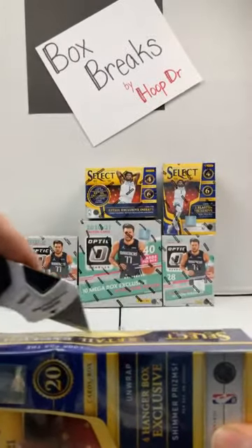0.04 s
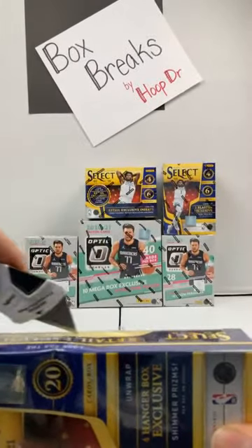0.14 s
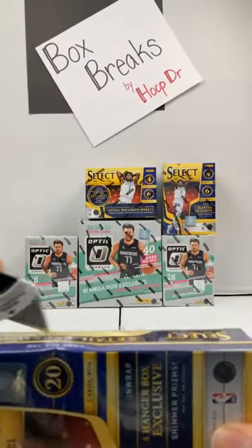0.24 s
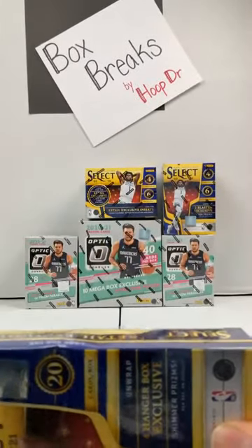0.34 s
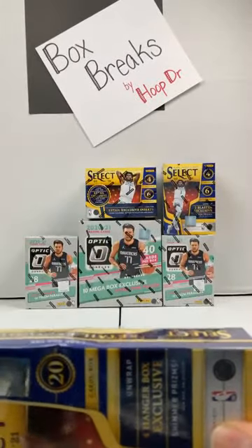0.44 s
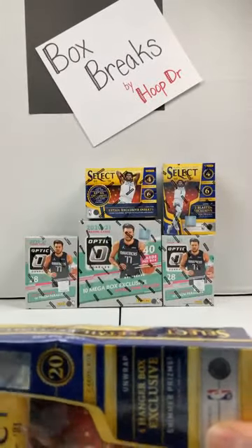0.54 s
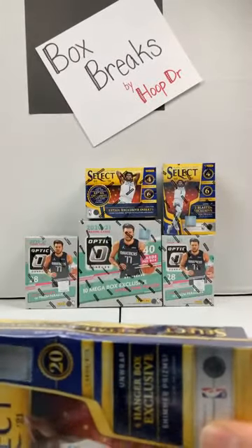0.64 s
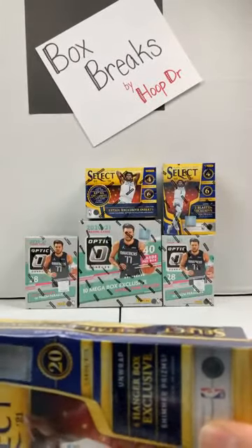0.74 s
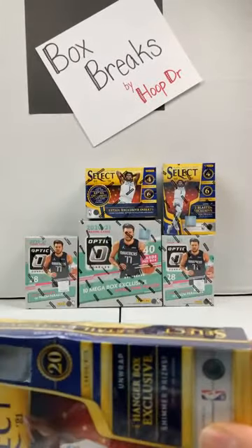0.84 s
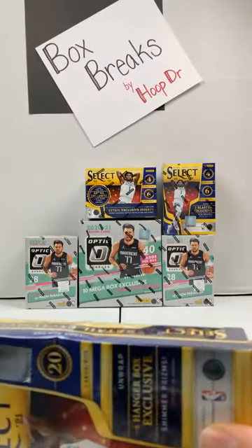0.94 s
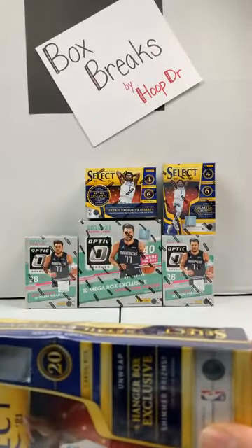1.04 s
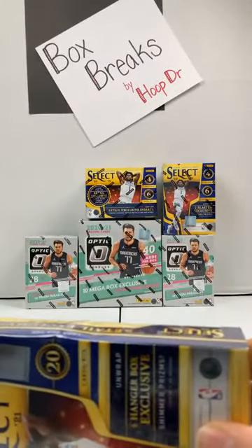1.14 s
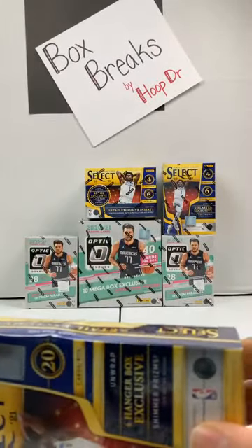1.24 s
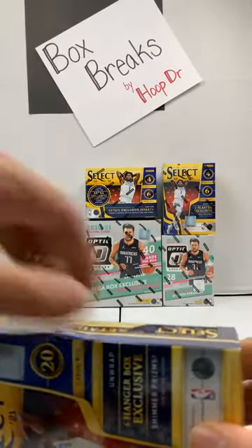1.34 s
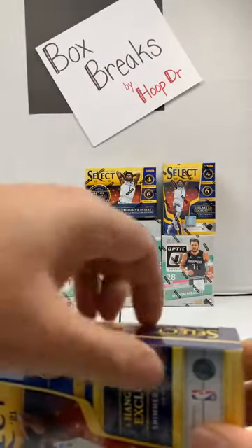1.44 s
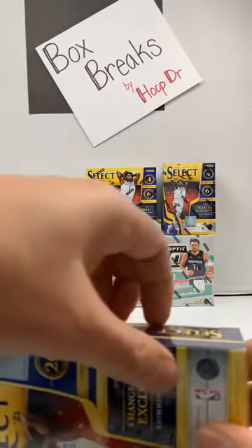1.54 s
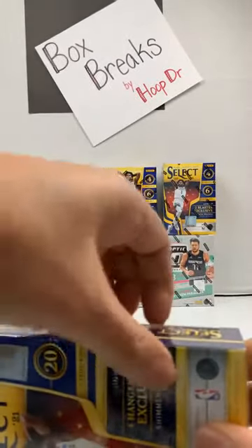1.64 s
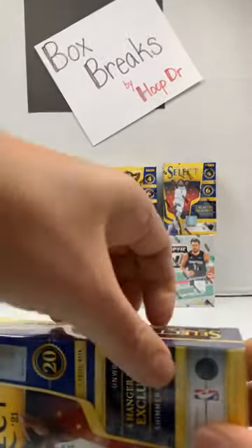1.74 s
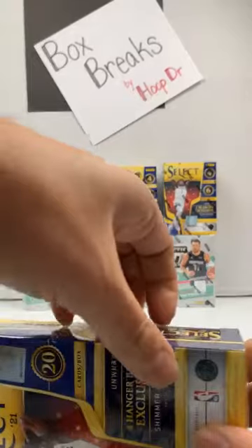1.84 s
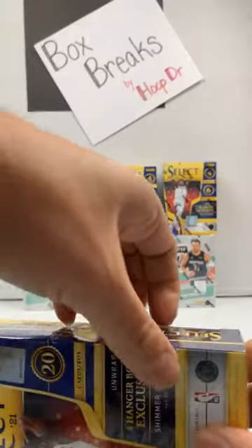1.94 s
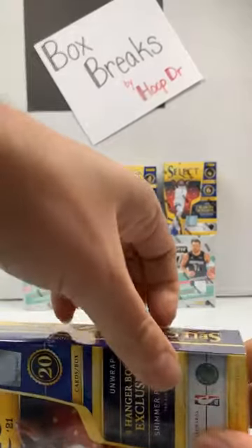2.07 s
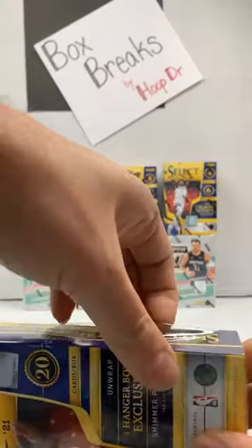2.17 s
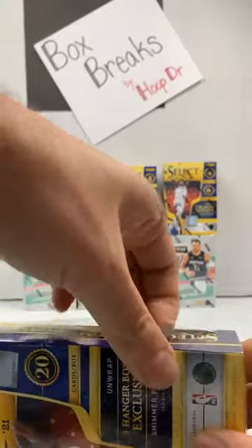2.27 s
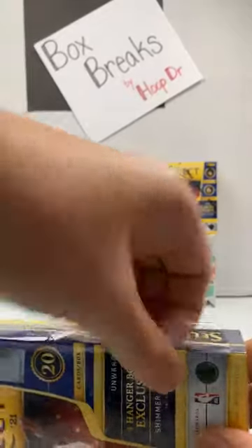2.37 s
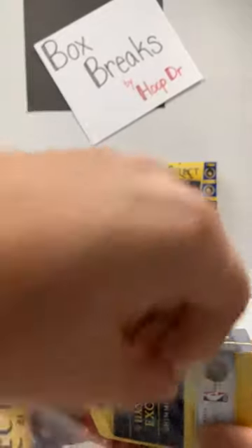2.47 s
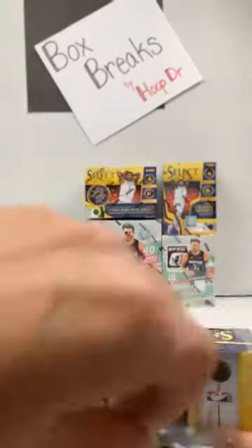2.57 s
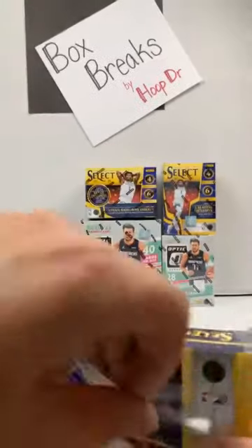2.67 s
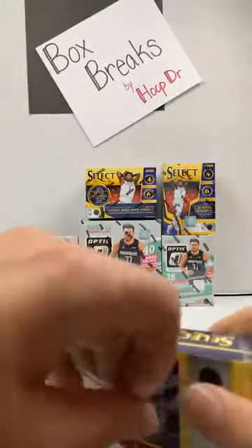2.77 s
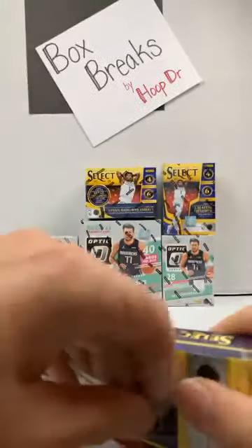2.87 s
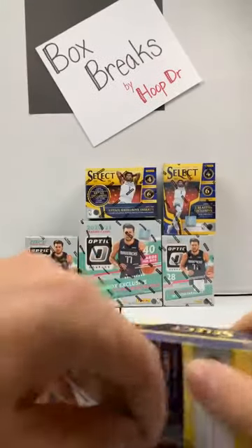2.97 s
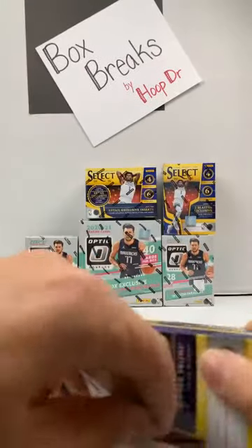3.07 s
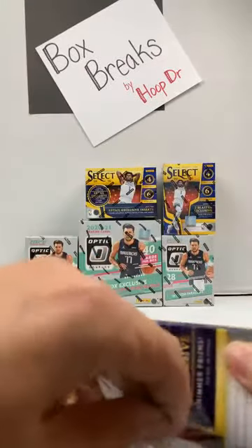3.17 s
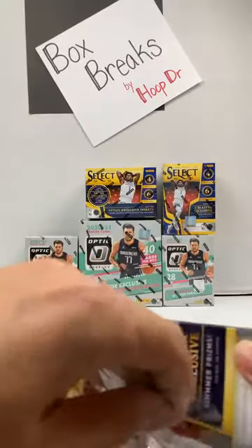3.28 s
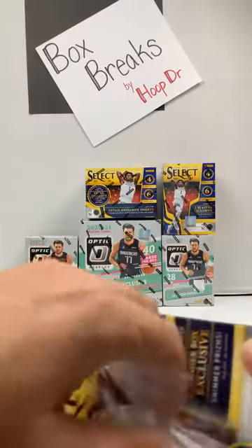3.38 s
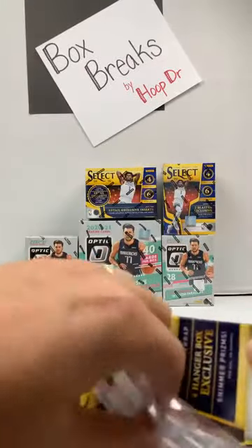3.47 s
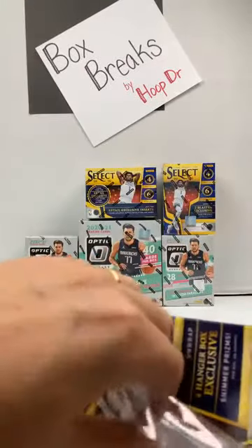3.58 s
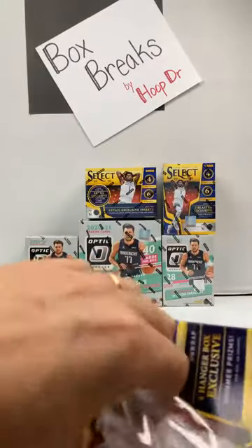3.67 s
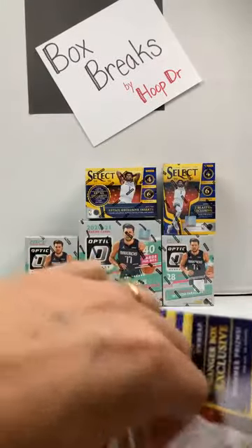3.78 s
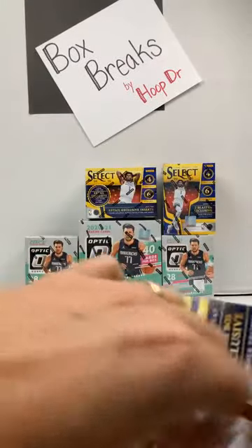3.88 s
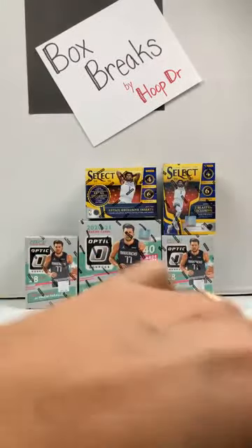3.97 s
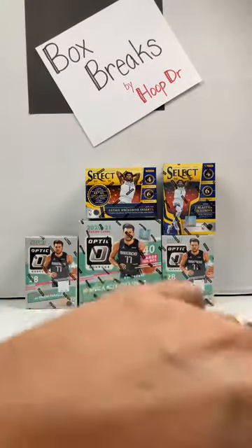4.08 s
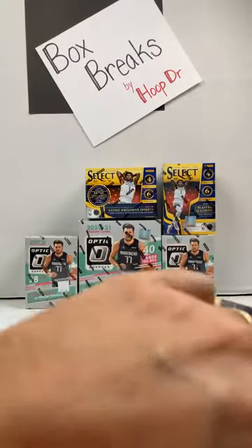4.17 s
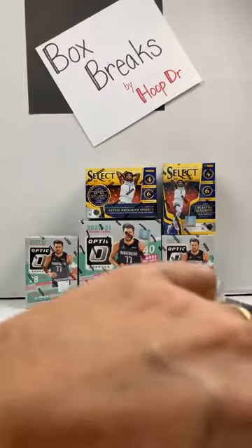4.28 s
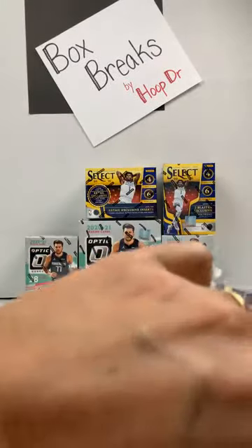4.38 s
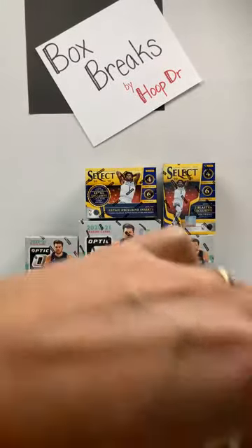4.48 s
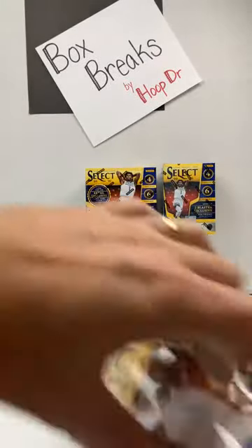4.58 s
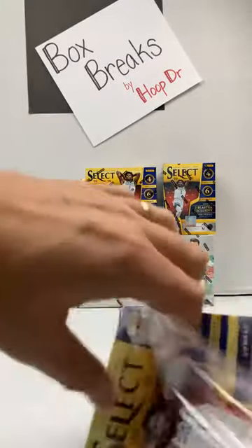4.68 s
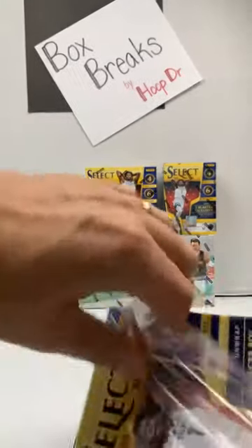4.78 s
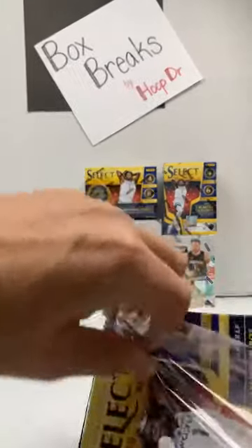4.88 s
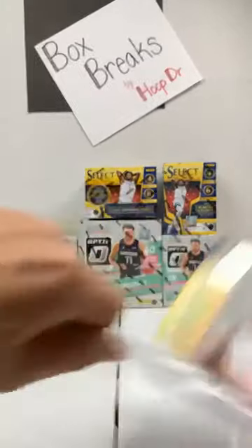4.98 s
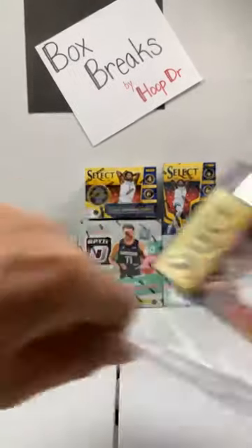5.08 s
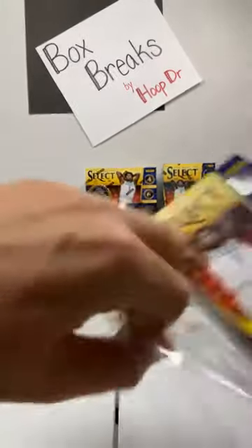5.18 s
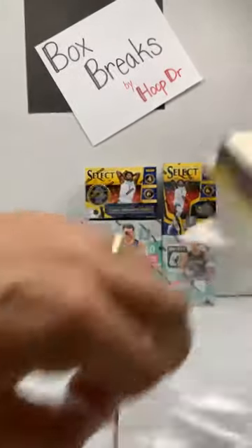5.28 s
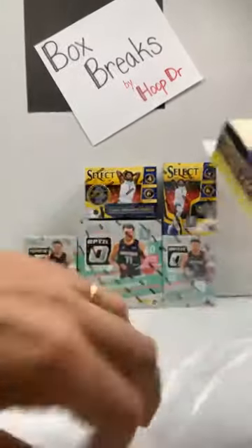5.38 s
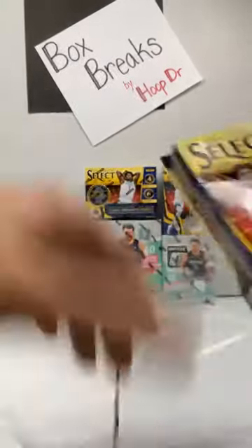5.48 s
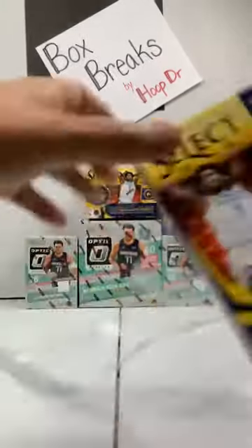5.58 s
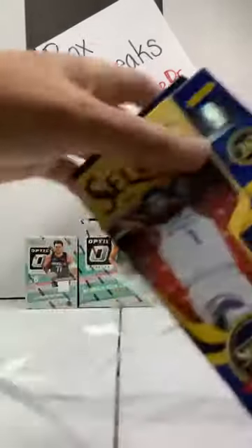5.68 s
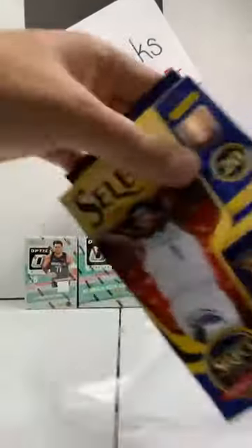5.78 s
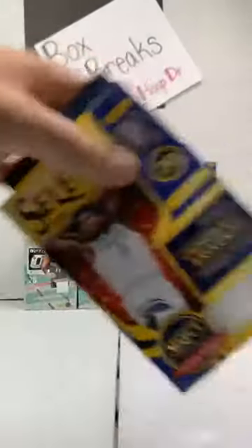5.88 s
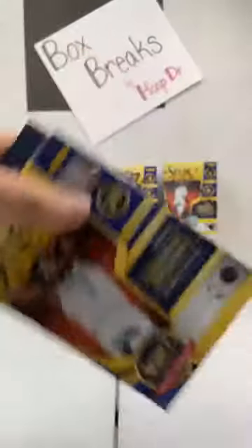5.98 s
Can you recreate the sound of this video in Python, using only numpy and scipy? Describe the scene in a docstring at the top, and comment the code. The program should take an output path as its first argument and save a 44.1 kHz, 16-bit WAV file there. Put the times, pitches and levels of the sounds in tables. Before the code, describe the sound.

A blade briefly scrapes through the plastic wrap on a cardboard box, then the knife is put down on a table with a small metallic rattle. Fingers tap the box and begin picking, tearing and crumpling the film, with sharp snaps and hollow cardboard knocks that grow loudest near the end. The handling sounds close, in a small room with a faint low hum.

```python
"""A blade scrapes out of the plastic wrap of a cardboard box, the board droning under it.
Around 1 s the knife is put down: loose metal rings, the handle knocks on the table.
From 1.4 s fingers tap the box, then pick, tear and crumple the film; it snaps and the box answers.
At 3.5 s the hands grip the box: its notes change, the film hangs loose and its creases sound lower.
Throughout, a small room rings briefly over a low wavering hum and a slowly growing table rumble."""
import sys
import numpy as np
from scipy import signal
from scipy.fft import rfft, irfft, next_fast_len
from scipy.io import wavfile
from scipy.ndimage import map_coordinates

SR = 44100
rng = np.random.default_rng(int(sys.argv[2]) if len(sys.argv) > 2 else 0)


def int16_out(signal):
    """Quantize to a 16-bit WAV file."""
    q = np.round(np.clip(np.atleast_2d(signal).T, -1, 1) * 32767)
    wavfile.write(sys.argv[1], SR, q.astype(np.int16))


N = 265482
GRIP_S = 3.52  # hands close on the box
LEAD_S = 0.006  # faint noise lead-in just before each burst

# Film spectrum: f/Hz, level/dB
FILM_SPECTRUM = [(880, -11), (1500, -9), (2510, -0.5), (2860, -5), (3280, -2.5), (9560, -2.5), (13800, -12),
                 (16000, -18)]
# Film snaps, short rips and finger taps on the box: t/s, length/s, rms level/dB, knock re level/dB
SNAPS_AND_TAPS = [(0.44, 0.0025, -44.5, 16), (0.47, 0.0052, -43, -27), (0.475, 0.018, -48.5, 6),
                  (1.408, 0.0046, -69.5, 1), (1.505, 0.0055, -53, 23), (1.514, 0.0028, -49.5, 19),
                  (1.5253, 0.0025, -57, 23.5), (1.576, 0.0023, -60, 8), (1.711, 0.0036, -72, 28),
                  (1.7556, 0.0049, -50, 18), (1.758, 0.0027, -47.5, -22), (1.954, 0.0054, -81, 33.5),
                  (2.241, 0.0051, -33.5, 3), (2.307, 0.0044, -35, -4.5), (2.377, 0.014, -47, 11.5),
                  (2.4144, 0.0084, -40.5, -1), (2.428, 0.019, -43, 2.5), (2.465, 0.0098, -40, -1),
                  (2.4746, 0.0021, -28, -5.5), (2.5068, 0.0065, -29.5, 1.5), (2.5435, 0.0047, -46, -12),
                  (2.5556, 0.0025, -28.5, 4.5), (2.584, 0.0032, -34.5, 2.5), (2.6138, 0.0056, -20, -7.5),
                  (2.6465, 0.0045, -35, -3), (2.674, 0.0025, -29, -24), (2.678, 0.012, -30.5, -2),
                  (2.714, .002, -40, -20), (2.73, .0023, -34.5, -24), (2.757, 0.0023, -35, -8),
                  (2.7635, 0.0029, -24, -11.5), (2.784, 0.0021, -41, -17), (2.824, 0.0024, -33, -4.5),
                  (2.851, 0.0028, -39, -8), (2.861, 0.0022, -39.5, 8), (2.895, 0.0041, -33.5, -24),
                  (2.925, 0.0044, -47, -20), (2.931, 0.0051, -38, -28), (3.0121, 0.0026, -21.5, -5),
                  (3.0232, 0.0068, -28.5, -2.5), (3.068, 0.0031, -30.5, -10), (3.083, 0.0038, -33, -30),
                  (3.1672, 0.0014, -29.5, -16), (3.194, 0.0047, -31.5, -7), (3.271, .0022, -36.5, -8),
                  (3.297, 0.0019, -36, -28), (3.3631, 0.0026, -31, -5.5), (3.445, 0.0028, -34, -24),
                  (3.465, 0.0033, -30, -13), (3.479, .003, -35, -10), (3.489, 0.0039, -23.5, -6),
                  (3.507, .007, -29, -7), (3.517, 0.0016, -24, -4), (3.5927, 0.0016, -17, -1.5),
                  (3.612, 0.0049, -40, 0), (3.63, 0.0036, -28, -13), (3.6584, 0.00085, -29.5, -3),
                  (3.7285, 0.0034, -26, -10.5), (3.8538, 0.01, -34, -0.5), (3.885, 0.0024, -33.5, -1),
                  (3.899, 0.0012, -27.5, 1.5), (3.908, 0.0026, -38, -1), (3.9317, 0.0024, -43, -8),
                  (3.953, 0.0048, -31, -5.5), (3.956, 0.003, -26, -13), (4.017, 0.0024, -32.5, 3),
                  (4.064, 0.0026, -21, -29), (4.081, 0.0034, -37, 1.5), (4.097, .007, -35.5, -7),
                  (4.1304, 0.0078, -33, -3.5), (4.1557, 0.0051, -34.5, 2.5), (4.177, 0.008, -41, 0),
                  (4.213, 0.0063, -29.5, -32), (4.298, 0.0052, -34, -4.5), (4.364, 0.002, -38.5, 0.5),
                  (4.3918, 0.0035, -30, -3.5), (4.531, 0.0026, -46, -2), (4.5705, 0.0076, -36, -32),
                  (4.5955, 0.0067, -38, -5), (4.614, 0.003, -30.5, -26), (4.698, 0.0082, -28, -16),
                  (4.7166, 0.012, -25, -8), (4.745, 0.017, -32, -7), (4.78, 0.0082, -26.5, -8.5),
                  (4.8165, 0.0043, -32.5, 0), (4.8227, 0.0021, -33, -10), (4.85, 0.0019, -31.5, -24),
                  (4.879, 0.0025, -28.5, -5), (4.888, 0.0048, -27, -20), (4.973, 0.0027, -36, -28),
                  (5.0307, 0.0059, -14, -3), (5.063, 0.022, -26.5, -21), (5.1064, .014, -22.5, -9),
                  (5.118, .012, -21.5, -2.5), (5.17, 0.0097, -27.5, -3), (5.184, 0.024, -25, -9.5),
                  (5.261, 0.0082, -25, -15), (5.297, 0.0018, -32, -15), (5.312, 0.0023, -25.5, -33),
                  (5.348, 0.0053, -27.5, -5), (5.364, 0.0023, -24, -13), (5.3774, 0.027, -27, -3),
                  (5.403, 0.019, -21.5, -5.5), (5.507, 0.012, -33.5, -14), (5.629, 0.017, -43.5, -4),
                  (5.762, 0.0049, -46.5, -23), (5.877, 0.0029, -44, -25), (5.911, 0.001, -38, 14.5),
                  (5.92, 0.011, -37.5, -19), (5.9553, 0.0052, -29, -9.5), (5.987, 0.016, -38, -6)]


def snaps_and_taps():
    """A grainy film crack plus a box knock: the crack leads in snaps and rips, the knock in taps."""
    taut_hz, loose_hz = 4790, 3470
    t_s, length_s, level_db, knock_db = columns(SNAPS_AND_TAPS)
    crease_hz = np.where(t_s < GRIP_S, taut_hz, loose_hz) * np.exp(0.052 * rng.standard_normal(t_s.shape))
    envelope = bursts(length_s, lead_in_db=np.minimum(-40 - level_db, -15))  # loud events: deeper onset
    age_s = np.arange(envelope.shape[1]) / SR - LEAD_S
    onset_spike = 1 + 0.72 * (age_s > 0) * np.exp(-np.abs(age_s) / 0.00069)
    noise, grain, knock_noise = rng.standard_normal((len(t_s), 3, len(age_s))).transpose(1, 0, 2)
    burst = noise * amp(3 * grain) * envelope * onset_spike
    corner_hz = 14000 * amp(-0.6 * knock_db)  # more knock, duller crack
    band_grid = np.meshgrid(np.arange(len(t_s)), np.arange(0, 15, 0.05), indexing="ij")
    bands = map_coordinates(rng.standard_normal((len(t_s), 16)), band_grid)
    colour_depth = np.minimum(0.0084 / length_s, 1)  # long rips average many creases

    def response(f):
        band = (f / SR * 2 * (bands.shape[1] - 1)).astype(int)
        ripple = amp(3.26 * colour_depth * bands[:, band])
        resonance = 1j * f * 0.17 * crease_hz / (crease_hz ** 2 - f * f + 1j * f * 0.39 * crease_hz)
        crease = 1 + colour_depth * amp(3) * resonance
        return ripple * crease * amp(log_interp(FILM_SPECTRUM, f)) / (1 + (f / corner_hz) ** 2)

    crack = at_level(filtered(burst, response), level_db, length_s)
    knock = at_level(box(knock_noise * envelope, t_s), level_db + knock_db, length_s)
    return place(t_s - LEAD_S, crack + knock)


# Finger moves on the wrap: t/s, rise/s, hold/s, crinkle level/dB, cardboard rub level/dB
MOVES = [(1.51, .01, 0.033, -64.5, -68), (1.732, 0.042, 0.012, -65.5, -57.5),
         (2.019, 0.046, 0.012, -100, -55), (2.243, 0.026, 0.23, -53.5, -69),
         (2.586, 0.1, 0.079, -42.5, -46), (2.794, .12, 0.14, -49, -50), (3.007, 0.02, 0.044, -49, -73),
         (3.165, 0.016, 0.074, -55.5, -51.5), (3.466, 0.046, 0.026, -37.5, -42),
         (3.582, 0.063, 0.039, -42, -44), (3.797, 0.033, 0.019, -63, -41.5),
         (3.864, 0.086, 0.14, -38.5, -50), (4.033, 0.25, 0.057, -32.5, -40),
         (4.226, 0.031, 0.025, -43.5, -45), (4.392, 0.089, 0.015, -50.5, -51.5),
         (4.545, 0.022, .03, -50.5, -49), (4.589, 0.062, 0.18, -40.5, -44.5),
         (4.738, 0.054, .13, -41.5, -44.5), (4.95, 0.065, 0.11, -48, -56), (5.04, 0.0088, 0.21, -32.5, -40),
         (5.405, 0.13, 0.016, -28.5, -36.5), (5.628, 0.54, 0.053, -48.5, -50.5),
         (5.827, 0.12, 0.011, -51, -47.5), (5.929, 0.089, .12, -42.5, -43.5)]


def move_levels_db():
    """Crinkle and rub levels: each move swells, holds and fades; the moves add in power."""
    rise_db, fall_db_per_s = 30, 147
    t_s, rise_s, hold_s, *levels_db = columns(MOVES)
    age_s = np.arange(N) / SR - t_s
    swell_db = -rise_db * np.maximum(-age_s, 0) / rise_s
    fade_db = -fall_db_per_s * np.maximum(age_s - hold_s, 0)
    return [10 * np.log10(np.sum(amp(db + swell_db + fade_db) ** 2, axis=0) + 1e-14) for db in levels_db]


def film_handling():
    """Small creases pop at random over a clumpy rustle; the same movement rubs the cardboard."""
    pops_per_s, pop_t60_s, taut_hz, slack_hz = 110, 0.011, 4790, 2650
    t_s = np.arange(N) / SR
    crinkle_db, rub_db = move_levels_db()
    impulses = (rng.random(N) < pops_per_s / SR) * amp(np.minimum(4 * rng.exponential(size=N), 7))
    pops = signal.fftconvolve(impulses, amp(-60 * t_s[:SR // 20] / pop_t60_s))[:N]
    activity = np.abs(pops) + 0.52 * amp(2.46 * wobble(37))
    grains = activity * amp(2 * rng.standard_normal(N)) * rng.standard_normal(N)
    rustle = shaped(grains, FILM_SPECTRUM)
    taut, slack = (filtered(rustle, modes([(hz, 0.3 * hz, 0)])) for hz in (taut_hz, slack_hz))
    slackness = (t_s > GRIP_S) * np.clip(0.5 + wobble(9), 0, 1)
    bright = unit_rms(rustle + taut + slackness * (slack - taut))
    dull = filtered(bright, lambda f: 1 / (1 + (f / 6000) ** 2))
    crispness = np.clip((crinkle_db + 69) / 25, 0, 0.7)  # slow handling is duller
    crinkle = dull + crispness * (bright - dull)
    rub = unit_rms(box(activity ** 1.08 * rng.standard_normal(N), t_s))
    return amp(crinkle_db) * crinkle + amp(rub_db) * rub


# Hollow box modes: f/Hz, width/Hz, gain lying/dB, gain gripped/dB
BOX_MODES = [(270, 250, -14, -6.5), (457, 125, -5.5, -5.5), (589, 136, 2, -1), (743, 286, -3, -0.5),
             (975, 160, -4, 1), (1254, 143, -8.5, -3), (1730, 300, -19, -6)]


def box(force, t_s):
    """The cardboard resonates; the grip shifts the balance of its modes."""
    softened = filtered(force, lambda f: 1 / (1 + 1j * f / 2500))  # soft board passes little treble
    f_hz, width_hz, *gains_db = np.transpose(BOX_MODES)
    lying, gripped = (filtered(softened, modes(np.transpose([f_hz, width_hz, db]))) for db in gains_db)
    grip = np.clip((t_s - GRIP_S) / 0.061, 0, 1)
    return (1 - grip) * lying + grip * gripped


# Hand on box: t/s, peak level/dB, f/Hz, t60/s
CONTACTS = [(1.541, -35, 640, 0.045), (1.742, -32.5, 675, 0.061), (2.047, -37.5, 129, 0.082),
            (2.238, -19, 552, 0.024), (2.559, -32, 168, 0.024), (2.689, -23.5, 206, 0.025),
            (2.687, -21, 636, 0.018), (3.58, -28.5, 175, 0.084), (4.598, -30.5, 280, 0.031),
            (4.726, -25.5, 336, 0.12), (5.036, -23.5, 238, 0.088), (5.408, -26, 116, 0.071),
            (5.409, -19, 307, 0.037), (5.822, -32, 240, 0.046)]


def hand_bumps():
    """Each padded contact pushes one low, rough, quickly damped resonance."""
    t_s, peak_db, f_hz, t60_s = columns(CONTACTS)
    age_s = np.arange(SR // 5) / SR
    flutter = filtered(rng.standard_normal((len(t_s), len(age_s))), lambda f: np.exp(-(f / 300) ** 2))
    envelope = amp(-60 * age_s / t60_s) * (1 - np.exp(-age_s / 0.0018))
    bump = (1 + 0.81 * unit_rms(flutter)) * np.sin(2 * np.pi * f_hz * age_s) * envelope
    return place(t_s, amp(peak_db) * bump / np.abs(bump).max(axis=1, keepdims=True))


# Blade along the wrap: t/s, hiss level/dB, cardboard level/dB
BLADE_STROKE = [(-.05, -70, -47), (.32, -63, -55.5), (.43, -55, -40), (.5, -69, -77), (.56, -79, -85)]


def blade_slide():
    """The blade scrapes the film, brighter as it gets louder; the cardboard under it drones."""
    dull_db, crisp_db = -64, -52
    hiss_db, drone_db = level_curves_db(BLADE_STROKE)
    grit = amp(1.6 * wobble(122) + 2.8 * rng.standard_normal(N)) * rng.standard_normal(N)
    bright = filtered(grit, modes([(2320, 9200, 5), (4900, 230, 13.5), (5900, 440, 6), (9400, 2600, -7)]))
    dull = filtered(bright, lambda f: 1 / (1 + (f / 8500) ** 4))
    crispness = np.clip((hiss_db - dull_db) / (crisp_db - dull_db), 0, 1)
    hiss = dull + crispness * (bright - dull)
    board = modes([(456, 100, -2), (630, 55, 6), (960, 280, -8)])
    shudder = amp(0.29 * wobble(38.5)) * rng.standard_normal(N)
    drone = filtered(shudder, lambda f: board(f) / (1 + (f / 3000) ** 2))
    return amp(hiss_db) * unit_rms(hiss) + amp(drone_db) * unit_rms(drone)


# Handle-on-table modes: f/Hz, width/Hz, gain/dB
HANDLE_MODES = [(345, 106, -6), (480, 147, -1.5), (680, 410, -7.5), (1110, 420, -10.5), (2400, 1000, -23)]
# Knife touches: t/s, length/s, ring f/Hz, ring level/dB, crack level/dB, handle level/dB
KNIFE_TOUCHES = [(0.668, 0.003, 3470, -49.5, -60, -76), (0.818, 0.028, 2240, -61.5, -64, -64),
                 (0.92, 0.004, 3980, -37.5, -44.5, -32.5), (0.9392, 0.0024, 3930, -60, -34.5, -26),
                 (0.957, 0.002, 4000, -43, -63, -30.5), (1.046, 0.0052, 4600, -44, -35, -29),
                 (1.138, 0.0088, 3670, -53.5, -66, -45)]


def knife_rattle():
    """Each touch rings a loose metal part, cracks and knocks the handle on the table."""
    t_s, length_s, ring_hz, ring_db, crack_db, handle_db = columns(KNIFE_TOUCHES)
    envelope = bursts(length_s, lead_in_db=-22)
    ring, crack, thud = rng.standard_normal((len(t_s), 3, envelope.shape[1])).transpose(1, 0, 2) * envelope
    ring = filtered(ring, lambda f: modes([(ring_hz, 370, 0)])(f) ** 2)
    crack = filtered(crack, lambda f: modes([(5000, 7000, 0)])(f) / (1 + (f / 9000) ** 6))
    thud = filtered(thud, modes(HANDLE_MODES))
    parts = (ring, ring_db), (crack, crack_db), (thud, handle_db)
    return place(t_s - LEAD_S, sum(at_level(part, db, length_s) for part, db in parts))


# Room decay: f/Hz, t60/s
ROOM_DECAY = [(300, 0.28), (2000, 0.3), (5000, 0.27), (14000, 0.24)]


def room(x):
    """Each frequency of the echo dies at its own rate; every quarter second gets its own random tail."""
    wet, step = np.zeros(N + SR), SR // 4
    for start in range(0, N, step):
        f_hz, t_s, noise = signal.stft(rng.standard_normal(SR // 3), SR, nperseg=256)
        decay = amp(-60 * t_s / log_interp(ROOM_DECAY, f_hz)[:, None])
        tail = signal.istft(noise * decay, SR, nperseg=256)[1]
        echo = signal.fftconvolve(x[start:start + step], tail / np.linalg.norm(tail))
        wet[start + 130:][:len(echo)] += echo  # first walls at 3 ms
    return wet[:N]


# Hum resonances, before the exponent: f/Hz, width/Hz, gain/dB
HUM_MODES = [(76, 19, -22), (126, 19, -6), (143.4, 10, -1), (241.8, 32.4, -9.5)]
# Room noise spectrum: f/Hz, level/dB
AIR_SPECTRUM = [(25, -35), (90, -14.5), (350, -18), (460, -20), (1300, -36.5), (2500, -46.5), (4600, -60),
                (9000, -64), (16000, -93)]


def room_tone():
    """Narrow noise bands make a wavering hum over dull room noise."""
    hum = unit_rms(filtered(rng.standard_normal(N), lambda f: modes(HUM_MODES)(f) ** 1.58))
    air = shaped(rng.standard_normal(N), AIR_SPECTRUM)
    return amp(-51) * hum + amp(-57) * air


# Table rumble spectrum: f/Hz, level/dB
RUMBLE_SPECTRUM = [(25, -21), (50, 2.5), (90, 9), (200, 3), (400, -50.5)]
# Table rumble envelope: t/s, level/dB
RUMBLE_LEVELS = [(0, -61.5), (3, -56), (5.2, -48), (6.02, -48)]


def table_rumble():
    """The table rumbles unevenly under the hands."""
    shaking = amp(3 * wobble(23)) * rng.standard_normal(N)
    return amp(level_curves_db(RUMBLE_LEVELS)[0]) * shaped(shaking, RUMBLE_SPECTRUM)


def amp(db):
    """Decibels to gain."""
    return 10 ** (np.asarray(db) / 20)


def unit_rms(x):
    return x / np.sqrt(np.mean(x ** 2) + 1e-20)


def columns(table):
    """Table columns, each shaped (events, 1)."""
    return np.transpose(table)[:, :, None]


def log_interp(points, f_hz):
    """(f/Hz, value) points read on a log frequency axis."""
    knots_hz, values = np.transpose(points)
    return np.interp(np.log(f_hz + 1), np.log(knots_hz + 1), values)


def level_curves_db(table):
    """One per-sample curve for each level column; -120 dB outside the table's times."""
    t_s, *levels_db = np.transpose(table)
    return [np.interp(np.arange(N) / SR, t_s, db, -120, -120) for db in levels_db]


def wobble(knots_per_s):
    """Smooth random curve."""
    knots = rng.standard_normal(int(N * knots_per_s / SR) + 4)
    return map_coordinates(knots, [np.arange(N) * knots_per_s / SR])


def filtered(x, response):
    """x through a complex frequency response."""
    size = next_fast_len(x.shape[-1] + 8192)
    return irfft(rfft(x, size) * response(np.fft.rfftfreq(size, 1 / SR)), size)[..., :x.shape[-1]]


def shaped(x, spectrum):
    """x coloured by (f/Hz, level/dB) points, at rms 1."""
    return unit_rms(filtered(x, lambda f: amp(log_interp(spectrum, f))))


def modes(table):
    """Causal response of (f/Hz, width/Hz, gain/dB) resonances, alternating in sign."""
    return lambda f: sum((-1) ** k * amp(db) * 1j * f * width / (hz * hz - f * f + 1j * f * width)
                         for k, (hz, width, db) in enumerate(table))


def bursts(length_s, lead_in_db):
    """Envelopes: faint lead-in, sudden rise, hold, and a decay that grows with event length."""
    t_s = np.arange(SR // 10) / SR - LEAD_S
    attack_s, t60_s = np.minimum(0.023 * length_s, 0.0006), 0.012 + 2.9 * length_s
    lead_in = amp(lead_in_db) * (1 + t_s / LEAD_S)
    rise = 1 - (1 - amp(lead_in_db)) * np.exp(-np.abs(t_s) / attack_s)
    return np.where(t_s < 0, lead_in, rise) * amp(-60 * np.maximum(t_s - 0.73 * length_s, 0) / t60_s)


def at_level(rows, rms_db, length_s):
    """Rows scaled to the energy of rms_db held for length_s."""
    return amp(rms_db) * rows * np.sqrt(length_s * SR / np.sum(rows ** 2, axis=1, keepdims=True))


def place(t_s, rows):
    """Sums each row into the track at its time."""
    index = np.round(t_s * SR).astype(int) + np.arange(rows.shape[1])
    return np.bincount(index.ravel(), rows.ravel(), N + SR)[:N]


def scene():
    """The knife lands further off than the box, so more of it arrives as echo."""
    near = snaps_and_taps() + hand_bumps() + blade_slide() + film_handling()
    far = knife_rattle()
    echo = room(amp(-11) * near + amp(-3) * far)
    return (near + far + echo + room_tone() + table_rumble())[None]


def record(dry):
    """The microphone drops the deepest bass and cuts the top steeply."""
    bass_hz, fade_hz, stop_hz = 52, 15600, 16650
    bass_cut = lambda f: (1j * f / bass_hz) ** 2 / (1 + 1.4j * f / bass_hz - (f / bass_hz) ** 2)
    top_cut = lambda f: amp(-np.clip((f - fade_hz) / 25, 0, 30)) * (f < stop_hz)
    return filtered(dry, lambda f: bass_cut(f) * top_cut(f))


dry = scene()
out = record(dry)
int16_out(out)
```